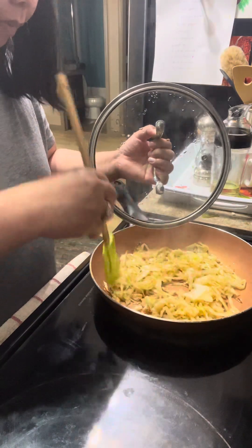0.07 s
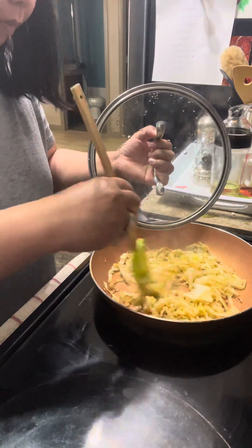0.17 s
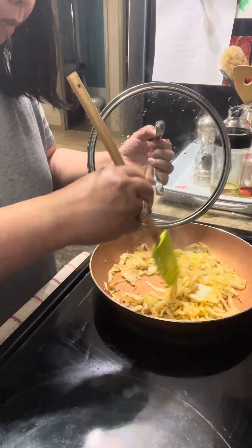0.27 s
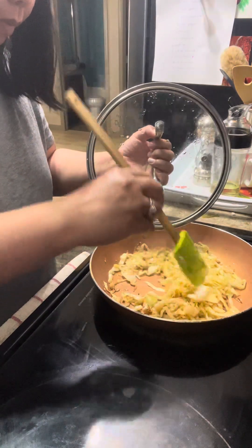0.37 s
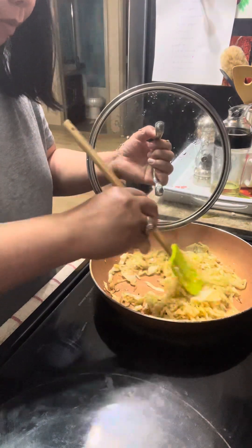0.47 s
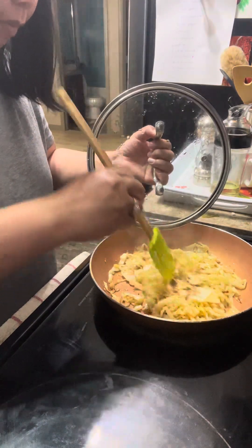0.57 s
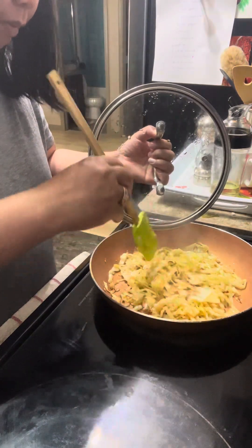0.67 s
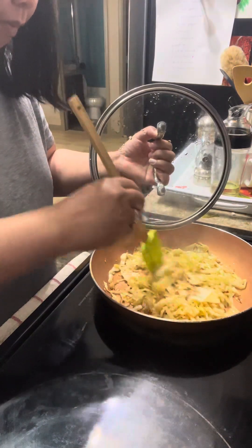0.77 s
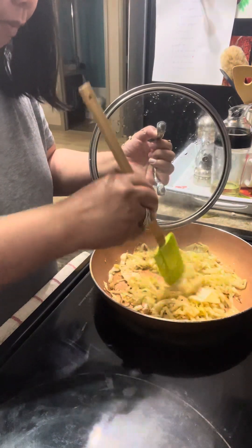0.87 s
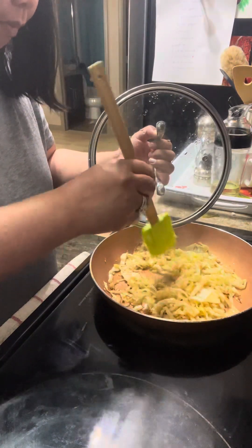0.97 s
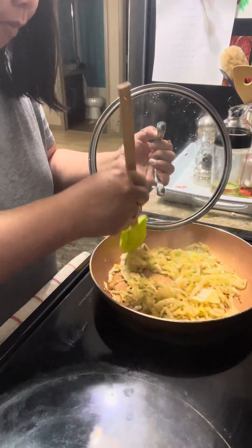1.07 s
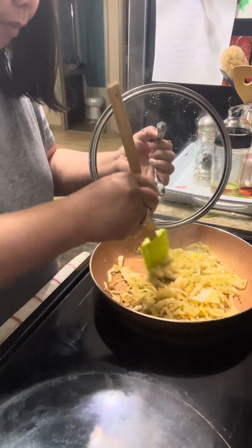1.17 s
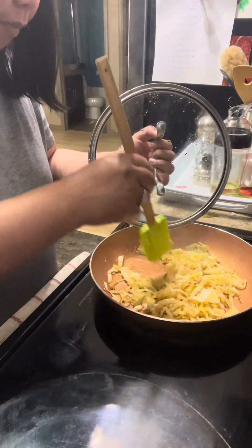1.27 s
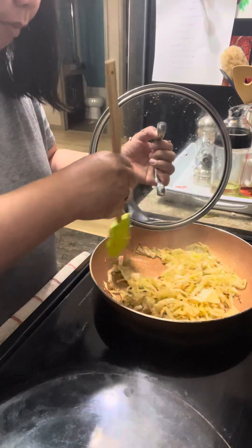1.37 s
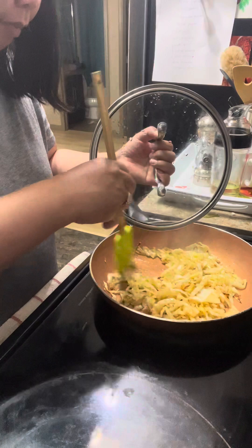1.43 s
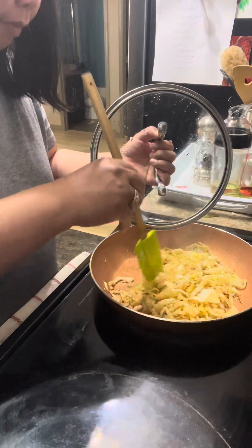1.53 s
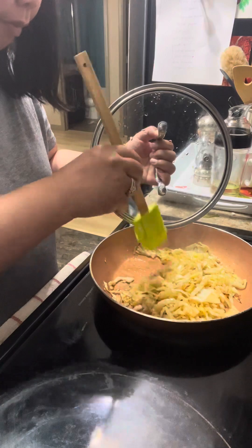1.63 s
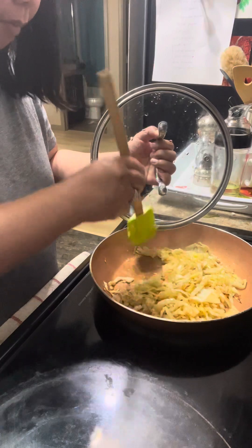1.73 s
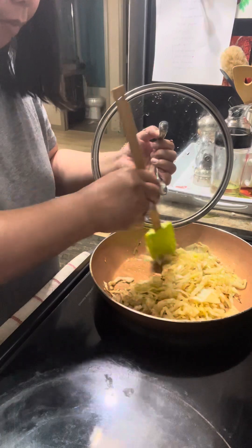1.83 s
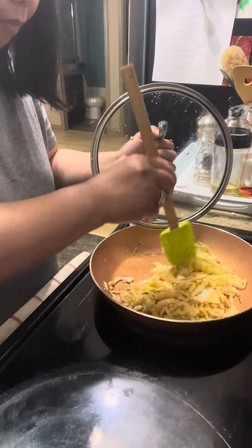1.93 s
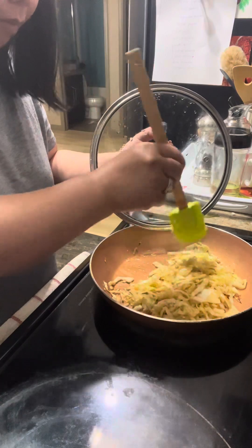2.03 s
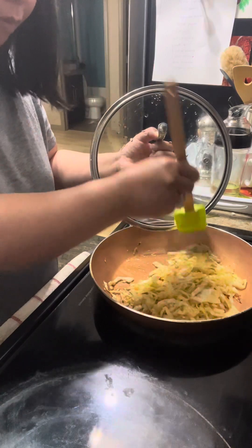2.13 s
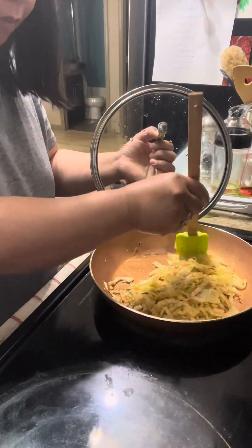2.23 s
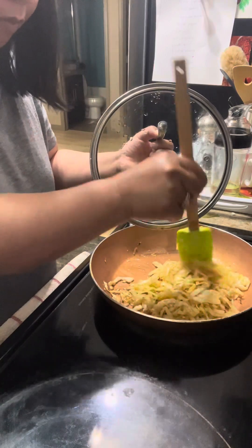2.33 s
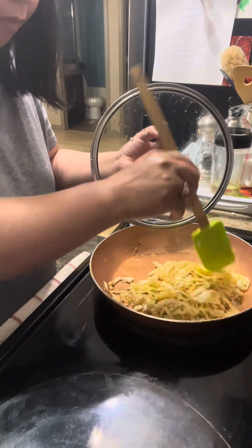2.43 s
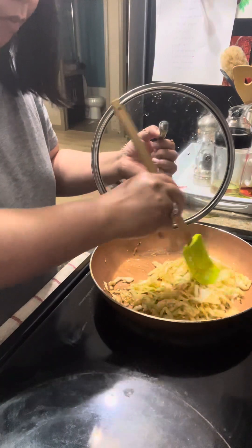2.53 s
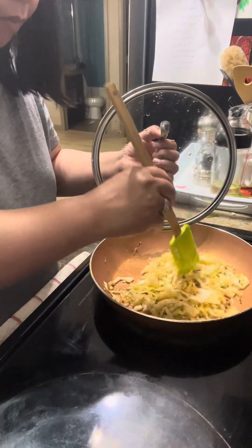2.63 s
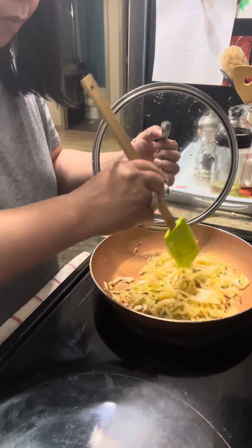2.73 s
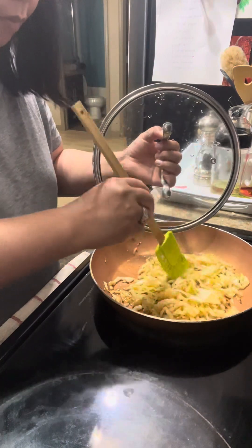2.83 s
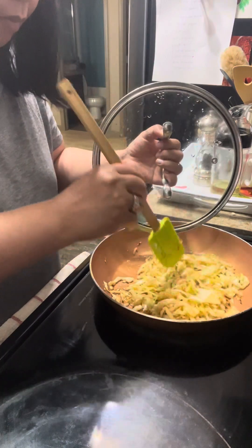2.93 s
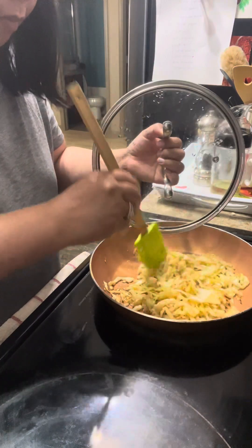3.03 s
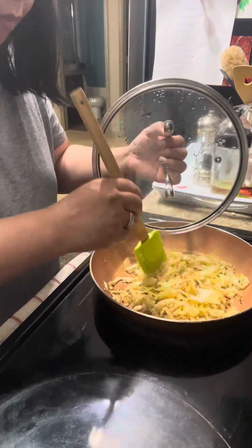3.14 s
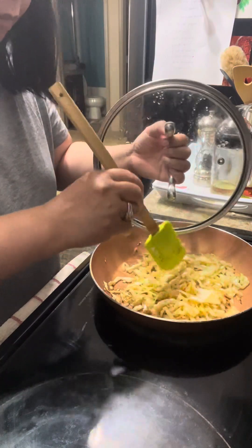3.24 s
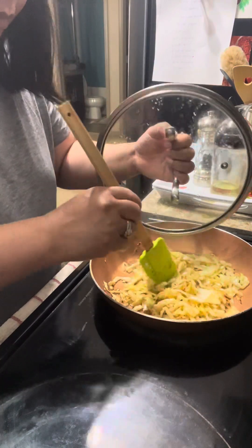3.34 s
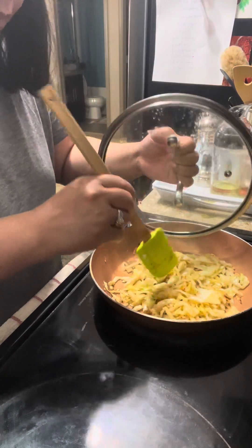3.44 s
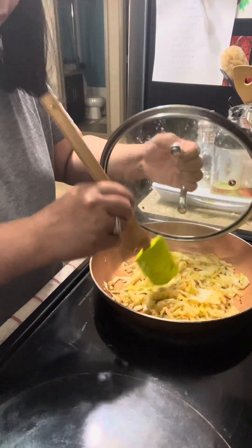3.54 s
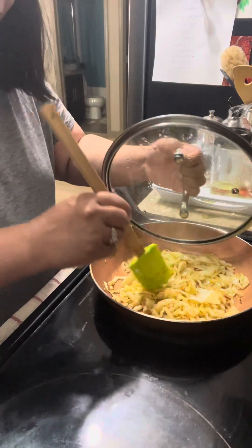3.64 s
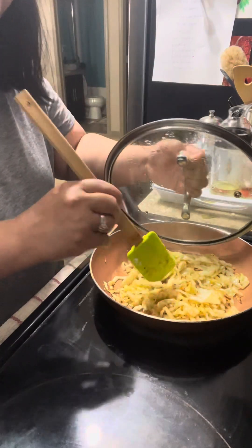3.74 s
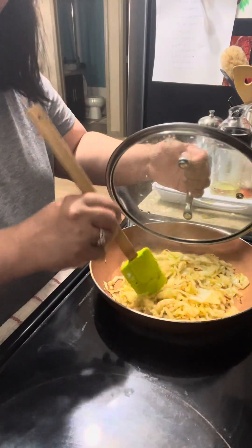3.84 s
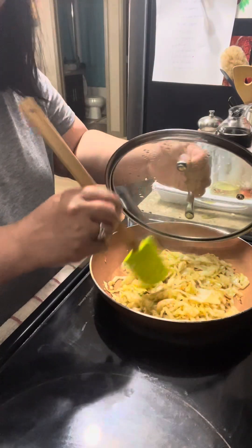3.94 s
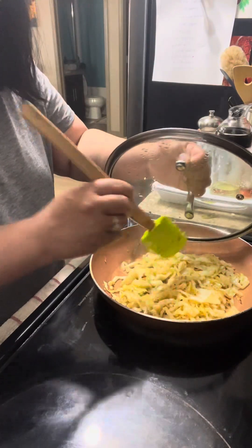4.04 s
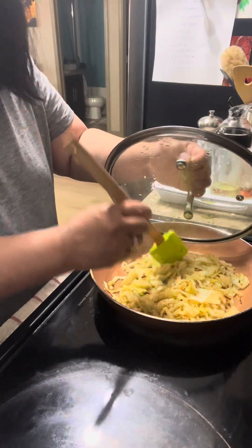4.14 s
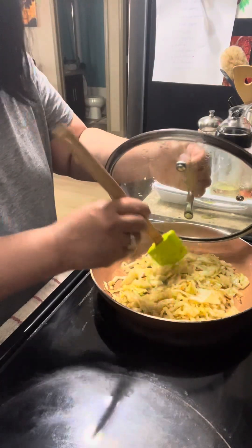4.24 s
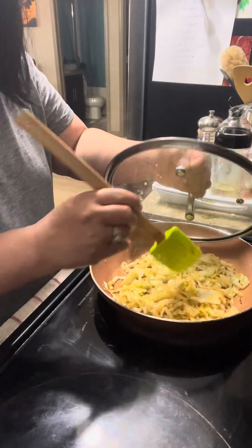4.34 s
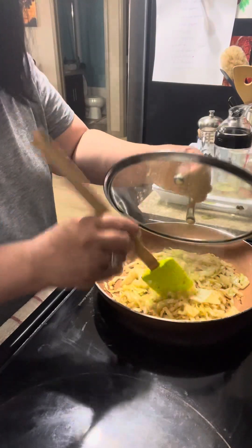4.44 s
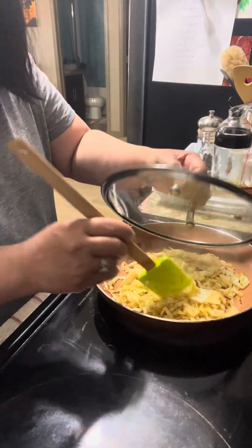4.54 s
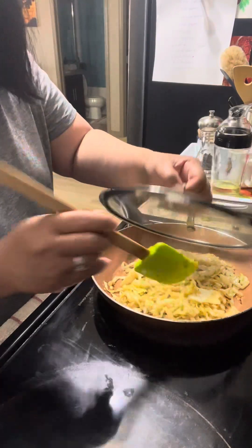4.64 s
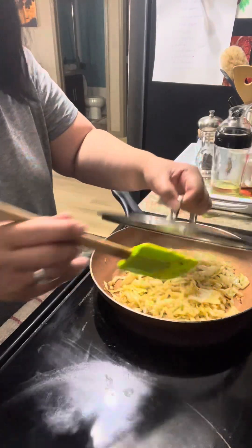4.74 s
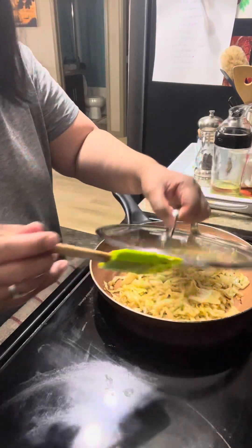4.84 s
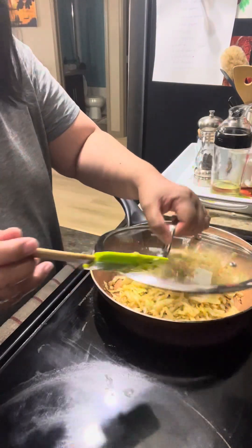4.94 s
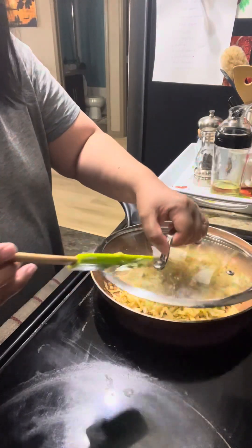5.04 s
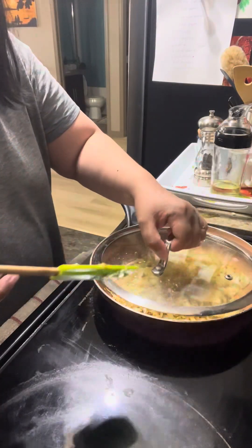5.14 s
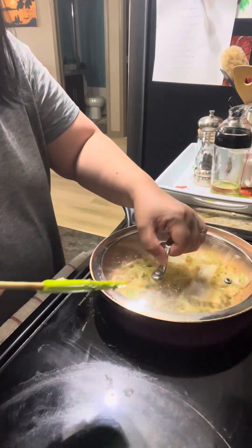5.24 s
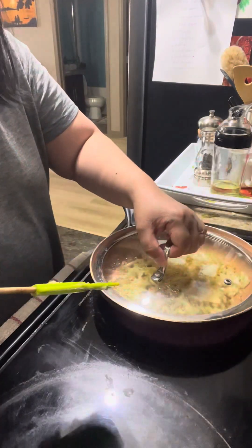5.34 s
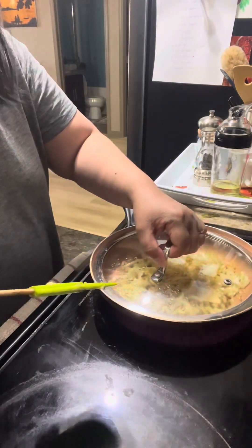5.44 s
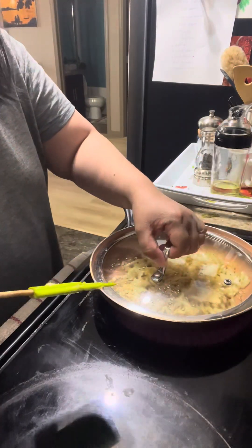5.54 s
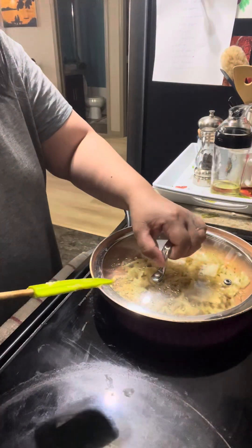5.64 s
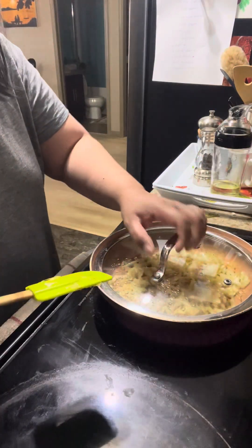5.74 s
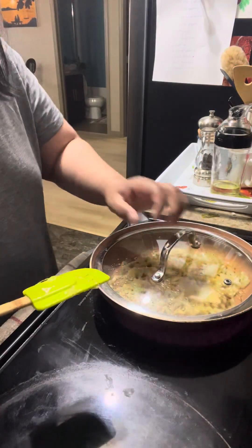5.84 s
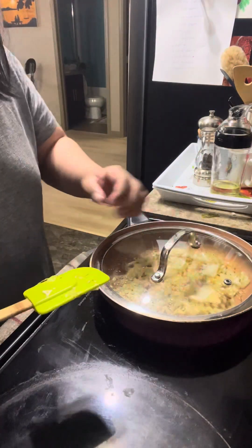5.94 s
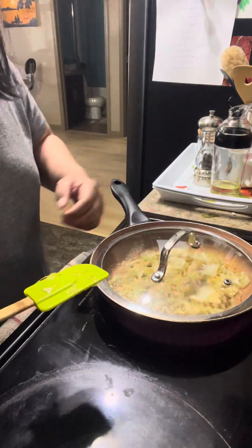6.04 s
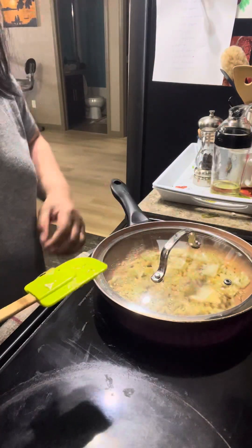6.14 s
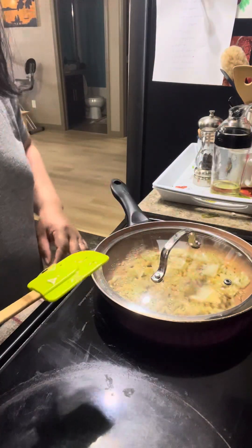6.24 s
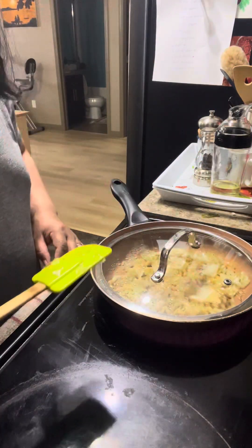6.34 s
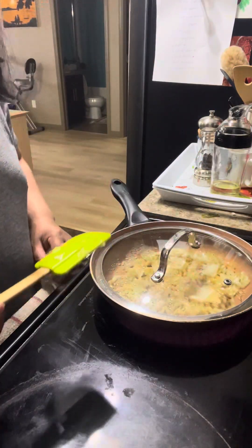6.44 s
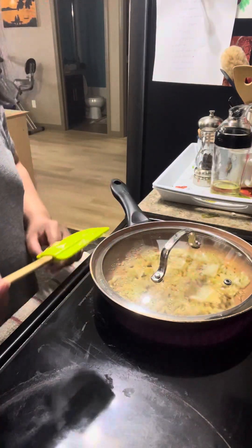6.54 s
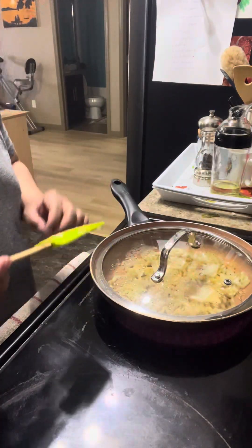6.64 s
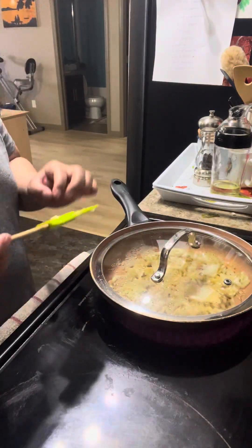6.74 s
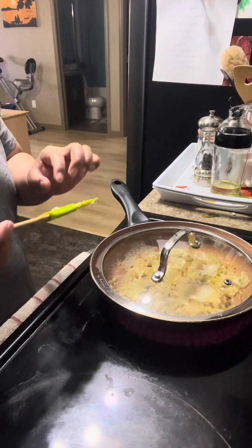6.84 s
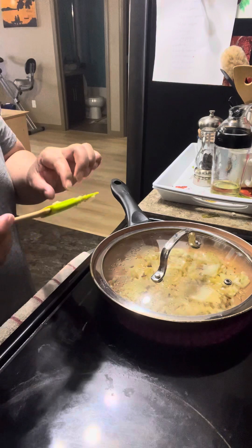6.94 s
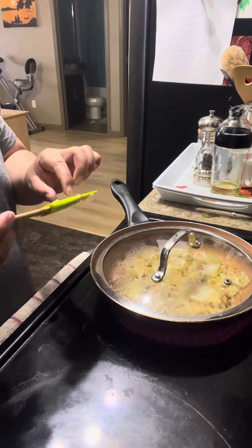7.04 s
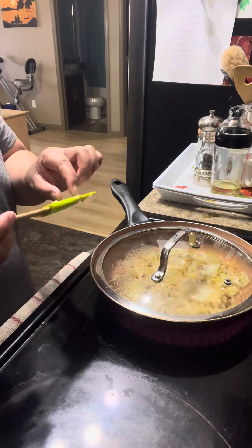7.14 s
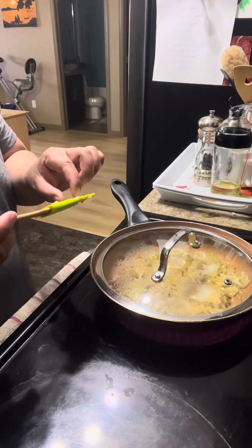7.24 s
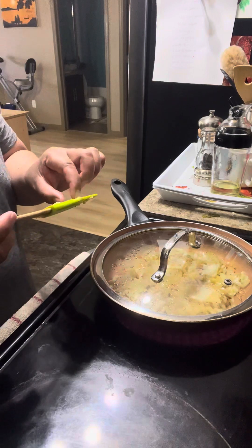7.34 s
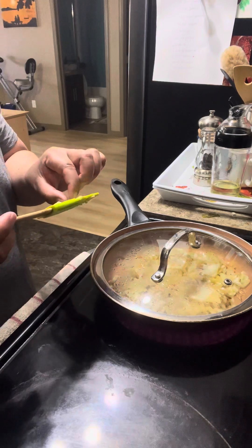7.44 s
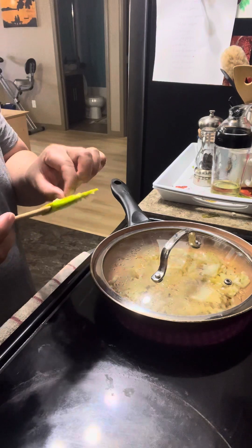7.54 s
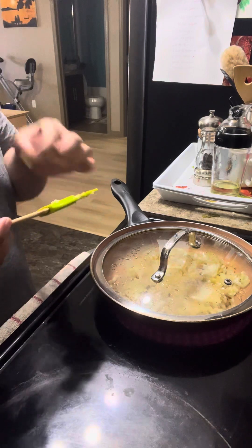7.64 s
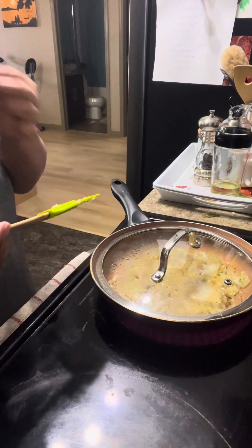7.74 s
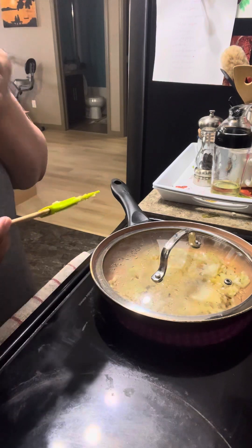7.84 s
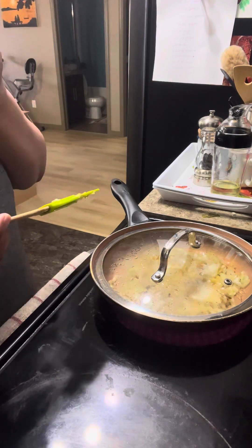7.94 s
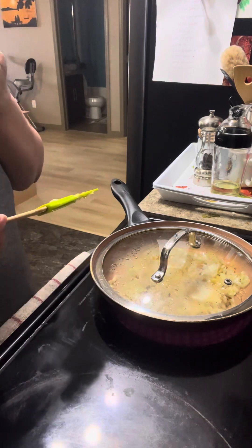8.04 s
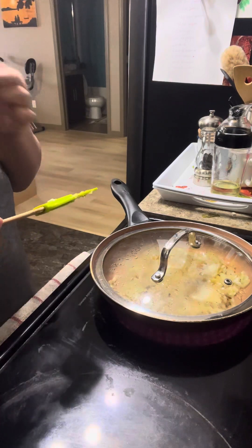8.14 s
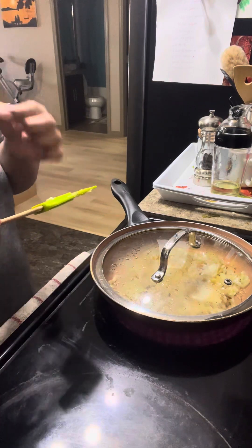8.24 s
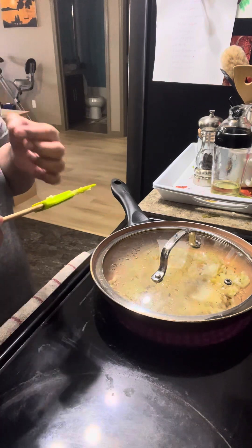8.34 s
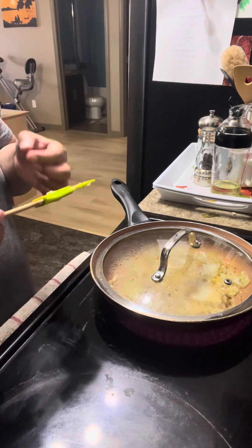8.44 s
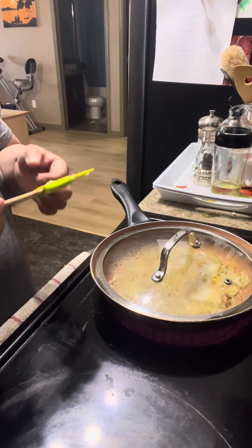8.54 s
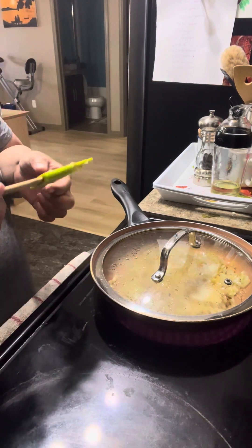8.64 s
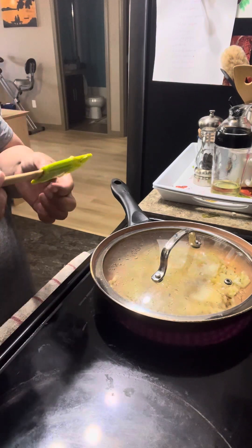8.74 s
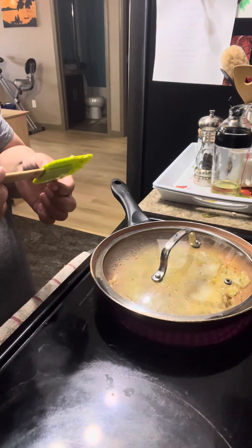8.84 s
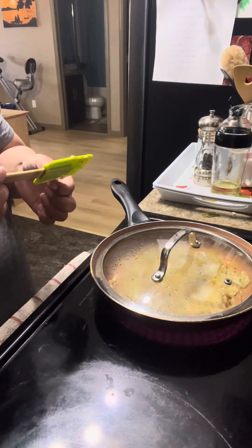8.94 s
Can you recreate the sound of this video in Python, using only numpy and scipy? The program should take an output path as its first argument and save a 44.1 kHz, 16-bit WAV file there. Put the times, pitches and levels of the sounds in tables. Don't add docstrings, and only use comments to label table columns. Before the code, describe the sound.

In a home kitchen, shredded cabbage fries loudly close to a stereo phone microphone, a dense bright hiss with sharp spits of fat. A soft spatula pats and knocks the pan, with low bumps from stirring. Around five seconds a glass lid clanks on the rim, the hiss turns hollow and drops sharply, leaving a faint dull simmer above a low hood fan.

```python
import sys
import numpy as np
from scipy import signal
from scipy.io import wavfile
from scipy.ndimage import uniform_filter1d

SR = 44100
rng = np.random.default_rng(int(sys.argv[2]) if len(sys.argv) > 2 else 0)


def invert_db(level):
    return 10 ** (np.asarray(level, dtype=float) / 20)


def generate_wav(sig):
    pcm = np.round(np.clip(np.atleast_2d(sig).T, -1, 1) * 32767).astype(np.int16)
    wavfile.write(sys.argv[1], SR, pcm)


N = 396900

# (time [s], cover [0-1])
LID = [
    (0, 0.03),
    (4.7, 0.12),
    (5.12, 0.13),
    (5.28, 0.58),
    (5.45, 0.97),
    (9, 1),
]


def evened(x):
    return x / np.sqrt(np.mean(abs(x) ** 2) + 1e-20)


def columns(rows, at):
    first, *rest = np.transpose(rows)
    return [np.interp(at, first, c) for c in rest]


def colour(points, hz):
    f, db = np.transpose(points)
    return np.interp(np.log(hz + 1), np.log(f + 1), db)


def bump(hz, centre_hz, width_hz):
    return 1 / (1 + (2 * (hz - centre_hz) / width_hz) ** 2)


def swells(rows, t):
    s, db, length = np.transpose(rows)[:, :, None]
    bells = np.exp(-(2 * (t - s) / length) ** 2 / 2)
    return (db * bells).sum(0)


def blotches(shape, bins, frames):
    z = rng.standard_normal(shape[::-1]).T
    z = uniform_filter1d(z, max(round(bins), 1), 0)
    return evened(uniform_filter1d(z, max(round(frames), 1), 1))


def spectra(x, size):
    return signal.stft(x, SR, "cosine", size)


def sound(z, size):
    return signal.istft(z, SR, "cosine", size)[1][:, :N]


def smeared(x, echo):
    smear = rng.standard_normal(1000) * np.exp(-np.arange(1000) / echo)
    return signal.oaconvolve(x, smear / np.linalg.norm(smear))[:N]


def comb(hz):
    # (tooth spacing [Hz], one tooth [Hz], fades above [Hz])
    spacing_hz, tooth_hz, fade_hz = (345, 810, 2100)
    reach = np.clip((hz - 300) / 300, 0, 1) * np.clip((fade_hz - hz) / 300, 0, 1)
    return reach * np.cos(2 * np.pi * (hz - tooth_hz) / spacing_hz)


def ports(direct, diffuse, hz, scatter=0):
    # (frequency [Hz], likeness [0-1], right phase lead [rad], left minus right [dB])
    port_rows = [(120, 1, 0, -.6), (220, .96, 0, -1), (330, .62, .1, -1), (650, .45, .6, -2),
                 (1400, .45, .7, -2.5), (2000, .6, .8, 3.5), (2350, .72, 2.9, 2.5), (2800, .66, 3, .5),
                 (3200, .3, 2, 0), (3500, .3, -.9, 1), (3900, .55, -.3, 1.5), (4400, .75, 0, 1),
                 (5100, .55, -.4, 0), (6000, .78, -1, .3), (7600, .8, -2.5, 0), (8800, .82, -3.14, 0),
                 (10000, .85, -3.94, 0), (11000, .85, -4.9, 0), (12000, .85, -5.8, 0),
                 (13300, .83, -6.28, 0), (14800, .8, -7.35, 0), (16000, .8, -8, 0)]
    same, lead, tilt_db = (c[:, None] for c in columns(port_rows, hz))
    same = np.clip(same + .3 * comb(hz)[:, None], 0, 1)
    same = same * (1 - scatter * (hz[:, None] < 5500))
    right = same * direct * np.exp(1j * lead) + np.sqrt(1 - same ** 2) * diffuse
    return np.array([direct * invert_db(tilt_db / 2), right * invert_db(-tilt_db / 2)])


def heard(x, other, gain_db, lid_scatter=0):
    hz, t, (direct, diffuse) = spectra(np.array([x, other]), size=1024)
    scatter = lid_scatter * columns(LID, t)[0]
    return sound(ports(direct, diffuse, hz, scatter) * invert_db(gain_db(hz[:, None], t)), size=1024)


def drone():
    # (frequency [Hz], level per Hz [dB])
    fan_colour = [(41, -54), (70, -21), (80, -12.5), (108, -4.5), (156, -1), (265, -19), (341, -13),
                  (386, -27), (442, -15.5), (539, -44), (600, -35), (780, -75), (1320, -120)]
    # (frequency [Hz], level per Hz [dB])
    deep_colour = [(20, -56), (32, -26), (47, 10.5), (60, 0.5), (80, -3.5), (110, -27.5)]
    # (frequency [Hz], rms level [dB])
    hum_tones = [(119.5, -56)]
    # (time [s], rise of the deep rumble [dB], length [s])
    strokes = [(.13, 7, .12), (.52, 8, 0.078), (.8, 10, .1), (1.2, 6, 0.092), (1.48, 12.5, 0.19),
               (1.88, 6, 0.22), (2.23, 10, 0.057), (2.55, -1, .25), (2.85, 7, 0.12), (3.35, 9, .1),
               (3.5, 4, .07), (3.67, 8, 0.15), (3.87, 5, .07), (4.19, 4, 0.099), (4.35, 8, 0.054),
               (4.51, 5, 0.14), (5.29, 5, 0.092)]
    fan_level_db, fan_lump_db, fan_shake = -49.5, 2.06, .15
    deep_level_db, deep_lump_db = -59.5, 1.5

    hz, t, z = spectra(rng.standard_normal((N, 4)).T, size=2048)
    shake_db = swells(strokes, t)
    fan_db = fan_level_db + fan_shake * shake_db + fan_lump_db * blotches((1, len(t)), 1, 3)
    deep_db = deep_level_db + shake_db + deep_lump_db * blotches((1, len(t)), 1, 4)
    fan_db = colour(fan_colour, hz)[:, None] + fan_db + 27.5 + 2.0 * blotches(z[0].shape, 5, 2)
    deep_db = colour(deep_colour, hz)[:, None] + deep_db + 28.0
    fan = ports(z[0], z[1], hz) * invert_db(fan_db)
    deep = ports(z[2], z[3], hz) * invert_db(deep_db)
    waver_hz = 2.76 * evened(uniform_filter1d(rng.standard_normal(N), 6000))
    hum = sum(invert_db(db + 2.5) * np.sin(2 * np.pi * np.cumsum(f + waver_hz) / SR) for f, db in hum_tones)
    return sound(fan + deep, size=2048) + hum


def knocks():
    # (time [s], thud [dB], ring [dB], clack [dB], rim mode struck most [Hz])
    rim_blows = [
        (2.93, -51, -46, -43, 920),
        (3.465, -29, -32, -31, 1770),
        (4.308, -34.5, -27, -30.5, 1770),
        (4.327, -37, -35, -40, 735),
        (4.449, -35, -44, -41, 1220),
        (4.683, -31, -26.5, -29, 790),
        (4.699, -29, -43, -43, 660),
        (4.711, -53, -46, -41, 660),
        (5.264, -37, -41, -47, 1220),
        (7.03, -58, -62, -51, 800),
    ]
    # (time [s], thud [dB], thud pitch [Hz], ring [dB])
    pats = [(0.764, -26.5, 134, -45), (1.108, -40, 168, -46), (1.788, -38, 136, -41.5),
            (2.21, -29, 135, -37.5), (4.155, -47, 178, -48), (4.479, -44, 152, -59),
            (4.847, -41, 134, -37.5), (5.937, -43, 162, -47), (7.989, -37.5, 122, -62),
            (8.16, -43, 159, -53), (8.186, -37.5, 153, -45.5), (3.335, -41.5, 150, -43.5),
            (3.59, -40, 120, -47)]
    # (frequency [Hz], level [dB], time to fall 60 dB [s])
    bottom_modes = [(279, -4, 0.28), (326.3, 1.5, 0.15), (350.4, -1.2, 0.2), (451.7, 1, 0.14),
                    (517, -3, 0.084), (570, -14.5, 0.07)]
    # (frequency [Hz], level [dB], time to fall 60 dB [s])
    rim_modes = [(657, 1.5, 0.048), (790, -5, 0.056), (938, -8, 0.086), (1080, -6, 0.048), (1220, -4, 0.12),
                 (1477, -3, 0.042), (1770, 1.5, 0.062)]
    # (frequency [Hz], level [dB], time to fall 60 dB [s])
    glass_modes = [(1640, -41, 0.17), (3410, -52.5, 0.5)]
    lid_lands_s, rim_thud_hz = 5.262, 139
    pat_clack_db, pat_rim_hz = -15, 700
    t, train = np.arange(9000) / SR, np.zeros(N)

    def mode(hz, db, t60, late, turn):
        u = np.maximum(t - late, 0)
        onset = 1 - np.exp(-(u * hz / .6) ** 2)
        return invert_db(db - 60 * u / t60) * onset * np.sin(2 * np.pi * (hz * u + turn))

    blows = [(s, thud, rim_thud_hz, *rest) for s, thud, *rest in rim_blows]
    blows += [(*row, row[-1] + pat_clack_db, pat_rim_hz) for row in pats]
    chance = rng.random((len(blows), 13, 2))
    for (s, thud_db, thud_hz, ring_db, clack_db, struck_hz), luck in zip(blows, chance):
        modes = [(f, d + ring_db - 8.0, t60, .003) for f, d, t60 in bottom_modes]
        modes += [(f, d + clack_db - 3 + 6 * bump(f, struck_hz, 400), t60, 0) for f, d, t60 in rim_modes]
        blow = mode(thud_hz, thud_db + 14.5, 0.035, 0.00526, 0.77)
        for (f, d, t60, late), (a, b) in zip(modes, luck):
            blow = blow + mode(f * (.96 + 0.064 * a), d, t60, late, b)
        part = train[round(s * SR):][:len(t)]
        part += blow[:len(part)]
    train[round(lid_lands_s * SR):][:len(t)] += sum(mode(f, d, t60, 0, 0) for f, d, t60 in glass_modes)
    return heard(train, np.roll(train, 10), lambda hz, t: 0 * hz)


def spits():
    # (time [s], peak level [dB])
    loud_spits = [(.0498, -24), (.198, -19), (.4339, -23), (.6594, -21), (.8305, -18), (.8438, -12),
                  (1.5354, -23), (1.5693, -21.5), (1.7649, -27), (1.9634, -20), (2.4397, -22), (2.812, -20),
                  (2.8997, -16), (3.3311, -12), (3.511, -20), (3.618, -16), (4.1195, -18), (4.1629, -17),
                  (4.2198, -20), (4.406, -12.5), (4.725, -13), (4.8928, -13), (4.9297, -22), (4.9758, -21),
                  (5.0679, -22), (5.0818, -19.5), (5.4974, -34), (7.5572, -30), (8.1833, -31),
                  (8.5051, -31)]
    # (frequency [Hz], level [dB])
    bright = [(1500, -30), (4000, -17), (7000, -13), (10000, -8), (13000, 0), (14500, 0), (16000, -6)]
    small_per_s, small_db, small_spread_db = 7.3, -37, 1.5

    train, fade = np.zeros(N), np.exp(-np.arange(500) / 130)
    open_pan = np.clip(1 - columns(LID, np.arange(N) / SR)[0], 0, 1) ** 2
    small = np.flatnonzero(rng.random(N) < small_per_s * open_pan / SR)
    small_levels_db = small_db + small_spread_db * rng.standard_normal(N)[small]
    rows = list(loud_spits) + list(zip(small / SR, small_levels_db))
    for (s, db), spatter in zip(rows, rng.standard_normal((200, 500))):
        burst = .4 * spatter * fade
        burst[0] = 1
        part = train[round(s * SR):][:500]
        part += invert_db(db) * burst[:len(part)]
    return heard(train, .5 * smeared(train, 60), lambda hz, t: 6 + colour(bright, hz))


def crackle(per_s, spread_db):
    clumps = invert_db(4.0 * evened(uniform_filter1d(rng.standard_normal(N), 900)))
    size = invert_db(spread_db * np.minimum(rng.exponential(1, N), 5)) * rng.choice([-1, 1], N)
    return evened(size * (rng.random(N) < per_s * clumps / SR))


def sizzle():
    # (time [s], level [dB])
    frying = [(0, -39), (.15, -38.5), (.5, -39), (1.1, -39.5), (2.4, -39.5), (2.7, -40), (3.15, -40.5),
              (3.5, -37.5), (3.95, -38.5), (4.3, -38.5), (4.5, -38), (4.7, -39), (4.86, -39.5), (5.06, -44),
              (5.2, -49), (5.49, -56), (9, -56.5)]
    # (time [s], resonance [Hz], boost [dB])
    gap_rows = [
        (4.6, 1260, 0),
        (4.8, 1240, 5),
        (4.95, 1200, 10),
        (5.2, 1140, 12),
        (5.35, 1110, 8),
        (5.5, 1080, 0),
    ]
    # (frequency [Hz], level per Hz [dB])
    open_colour = [(200, -14.5), (600, -11.5), (1000, -7.5), (1600, -8), (2000, -5), (3000, -1.5),
                   (3700, -1), (7000, 0.5), (7800, -4.5), (8800, -0.5), (11400, -7.5), (12600, -1.5),
                   (13900, 0), (14800, -3), (15800, -10)]
    # (frequency [Hz], level per Hz [dB])
    shut_colour = [(200, -11), (500, -4), (1000, 0), (1350, -3.5), (2000, -4.5), (3000, -1), (3800, -2.5),
                   (6000, 1), (7700, -3.5), (8800, 1.5), (11600, -8), (13200, -2), (14800, -8.5),
                   (15800, -11)]
    # (frequency [Hz], width [Hz], boost [dB])
    pan_modes = [(407, 17, 5), (800, 117, 1), (2010, 25, 10.5), (2290, 220, 4), (2840, 540, 2),
                 (1033, 50, -5), (2380, 35, -1), (3800, 72, 3.5), (4180, 110, 3.5), (4590, 99, 2.5),
                 (5800, 85, -2), (6070, 340, 0.5), (6350, 150, 0.5)]
    # (frequency [Hz], width [Hz], boost [dB])
    dome_modes = [(790, 80, 5), (1160, 100, -3), (1340, 120, -8), (1690, 120, 4), (2030, 80, 9),
                  (2300, 150, -2), (2470, 70, 3), (2900, 200, 2), (3600, 120, 3), (4200, 120, 2),
                  (5300, 300, -2), (6000, 500, 2)]
    # (time [s], rise [dB], length [s])
    flares = [
        (.85, 1, 0.073),
        (1.08, 1, .05),
        (2.53, 1.5, .07),
        (2.95, 1.6, 0.064),
        (3.08, 2, 0.047),
        (3.84, 2.5, .07),
        (4.46, 2.5, .06),
        (5.09, -0.5, .04),
    ]
    # (time [s], rise [dB], length [s])
    drags = [
        (4.45, 2, .15),
        (4.82, 11, 0.24),
        (5.2, 7.5, 0.16),
    ]
    drag_hz, drag_width_hz = 680, 160
    top_open_db, top_flare = 1.16, 0.55
    body_open_db, body_flare = -2.6, .1
    gap_treble = 0.13
    gap_overtones = [(1, 1.15), (1.96, 1), (2.98, .8)]

    def gain_db(hz, t):
        level_db, flare_db = columns(frying, t)[0], swells(flares, t)
        cover = np.clip(columns(LID, t)[0], 0, 1)
        gap_hz, gap_db = columns(gap_rows, t)
        top, body = np.clip((hz - 7000) / 4000, 0, 1), np.clip((2600 - hz) / 800, 0, 1)

        shape_db = (1 - cover) * colour(open_colour, hz) + cover * colour(shut_colour, hz)
        shape_db += sum(db * bump(hz, f, w) for f, w, db in pan_modes)
        shape_db += gap_db * sum(share * bump(hz, k * gap_hz, 120) for k, share in gap_overtones)
        shape_db += 1.7 * gap_db * bump(hz, 440, 60)
        shape_db += top * gap_treble * gap_db
        shape_db += (top * top_open_db + body * body_open_db) * (1 - cover)
        shape_db += flare_db * (1 - top * (1 - top_flare) - body * (1 - body_flare))
        shape_db += bump(hz, drag_hz, drag_width_hz) * swells(drags, t)
        shape_db += 2.0 * comb(hz)
        shape_db += cover * sum(db * bump(hz, f, w) for f, w, db in dome_modes)
        bare, lidded = blotches((len(hz), 2), 3, 1).T[:, :, None]
        shape_db += .9 * ((1 - cover) * bare + cover * lidded)
        patches_db = 1.16 * blotches(shape_db.shape, 12, 4)
        gusts_db = (.35 + .8 * top) * blotches((1, len(t)), 1, 2.1)
        return level_db + 9.0 + shape_db + patches_db + gusts_db

    treble = signal.butter(2, 7000, "high", fs=SR, output="sos")
    pops = .4 * signal.sosfilt(treble, crackle(690, 4.5))
    hiss, other_hiss = rng.standard_normal((N, 2)).T
    return heard(hiss + pops, other_hiss + smeared(pops, 200), gain_db, lid_scatter=.55)


def scene():
    return drone() + knocks() + spits() + sizzle()


def joint_stereo(x, weak_db, top_hz, faint_db):
    lead = 1024 - 890
    pair = np.pad([x[0] + x[1], x[0] - x[1]], ((0, 0), (lead, 0))) / 2
    hz, t, z = spectra(pair, size=2048)
    edges = np.r_[0, 96:160:8, 160:320:16, 320:672:32, 672:1024:16]
    power = np.add.reduceat(abs(z) ** 2, edges, 1)
    weak = power < power[::-1] * invert_db(2 * colour(weak_db, hz[edges]))[:, None]
    faint = power < invert_db(2 * np.reshape(faint_db, (2, 1, 1)))
    weak |= faint & (hz[edges, None] > 14400)
    kept = np.repeat(~weak, np.diff(np.r_[edges, len(hz)]), 1) & (hz < top_hz)[:, None]
    mid, side = signal.istft(z * kept, SR, "cosine", 2048)[1][:, lead:lead + N]
    return np.array([mid + side, mid - side])


def low_pass(x):
    return signal.sosfilt(signal.butter(12, 16920, fs=SR, output="sos"), x)


def record(dry):
    miked = signal.sosfilt(signal.butter(4, 38, "high", fs=SR, output="sos"), dry)
    # (frequency [Hz], level [dB])
    weak_db = [(1900, -40), (2000, -7.5), (3000, -7.5), (3500, -8.8), (6000, -8.8), (7000, -5.4)]
    mix = joint_stereo(miked, weak_db, top_hz=15790, faint_db=(-77.3, -82))
    return low_pass(mix)


dry = scene()
out = record(dry)
generate_wav(out)
```